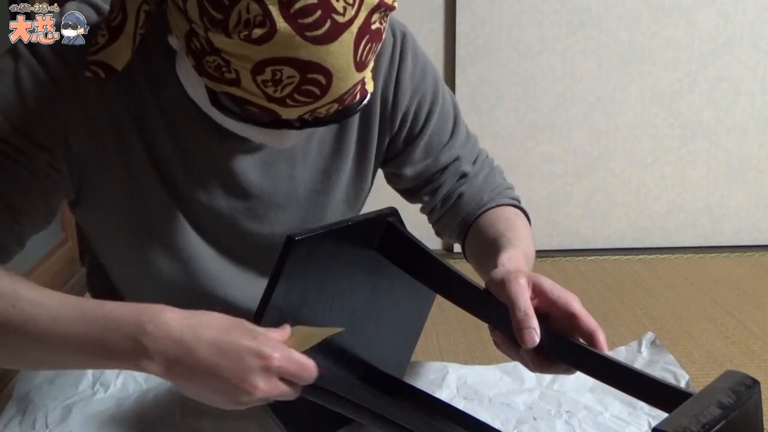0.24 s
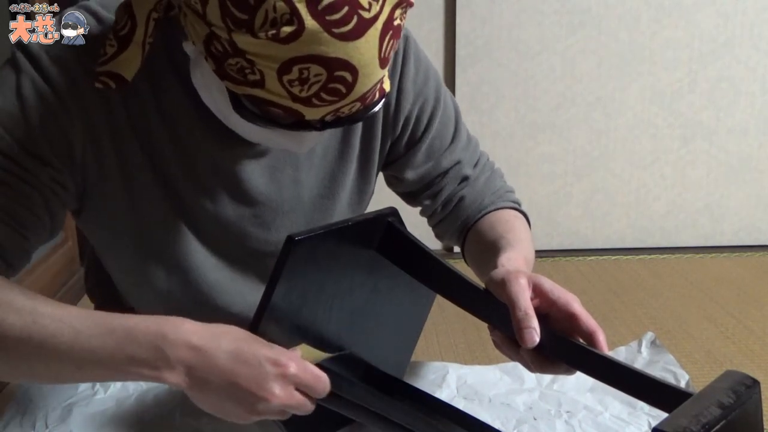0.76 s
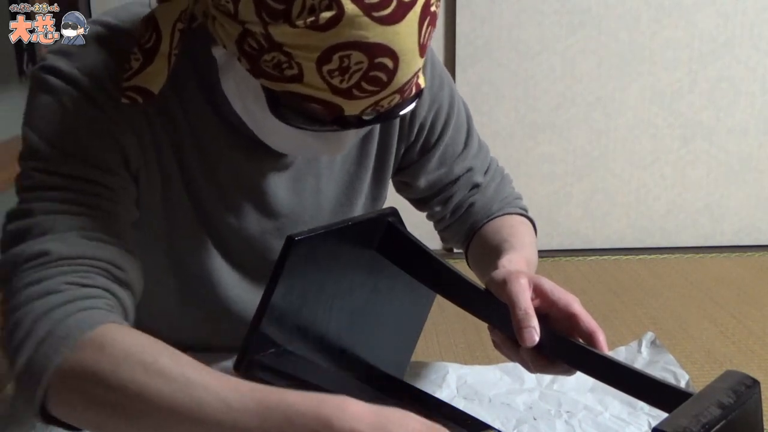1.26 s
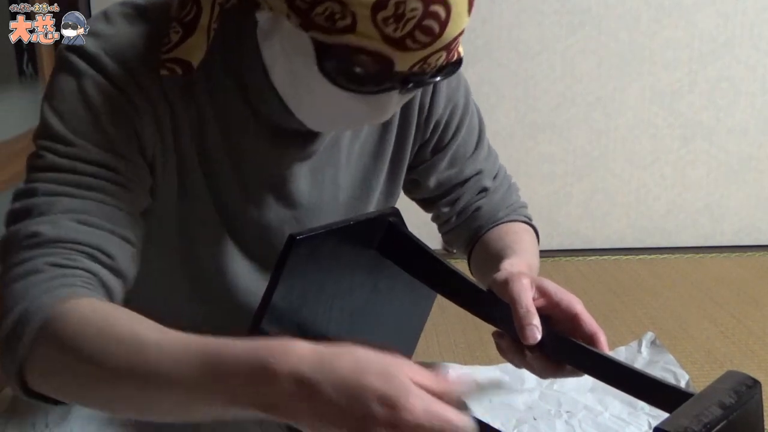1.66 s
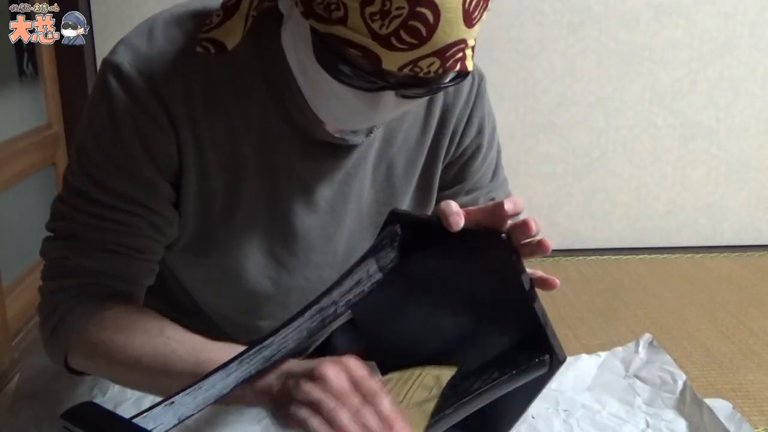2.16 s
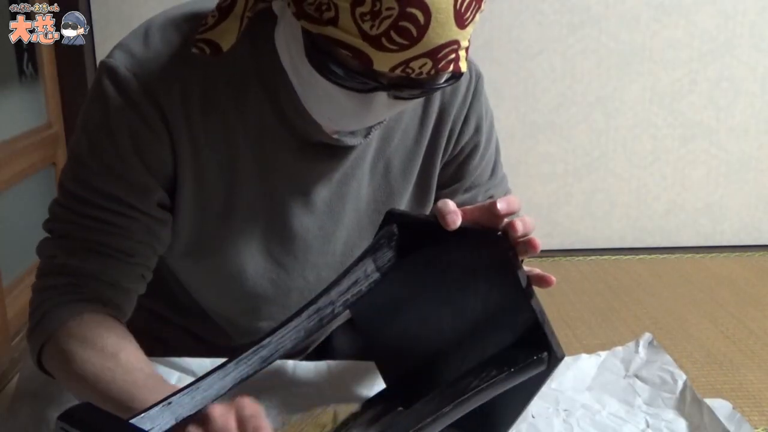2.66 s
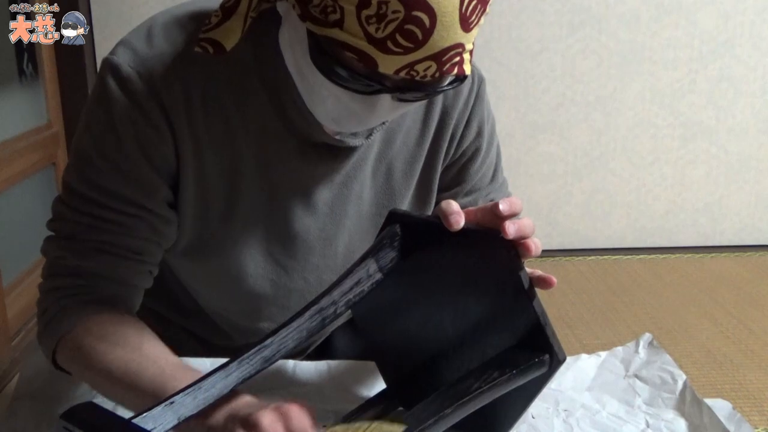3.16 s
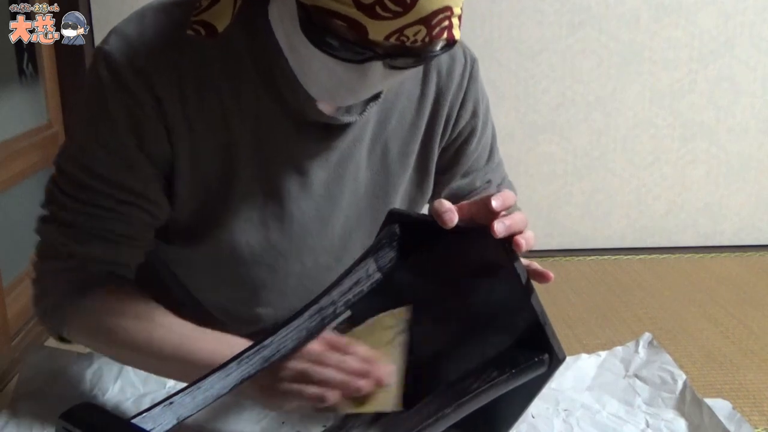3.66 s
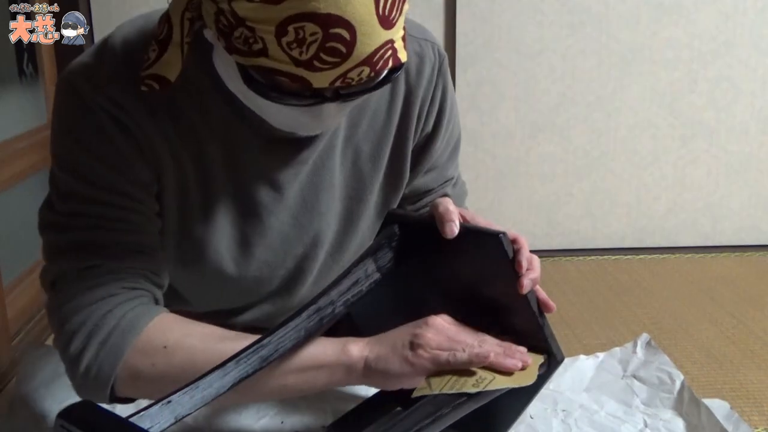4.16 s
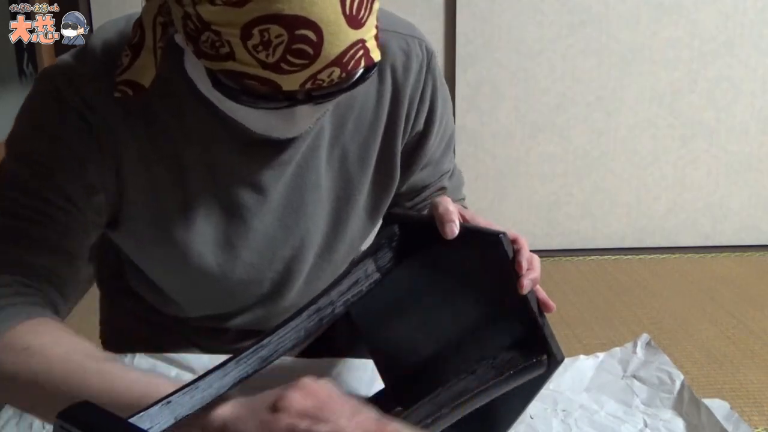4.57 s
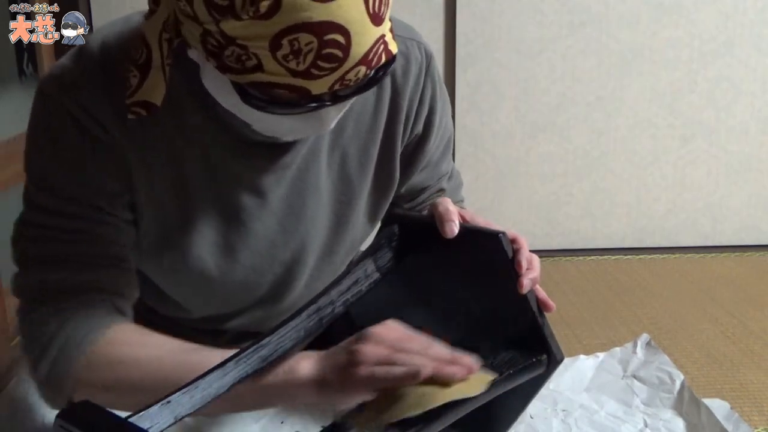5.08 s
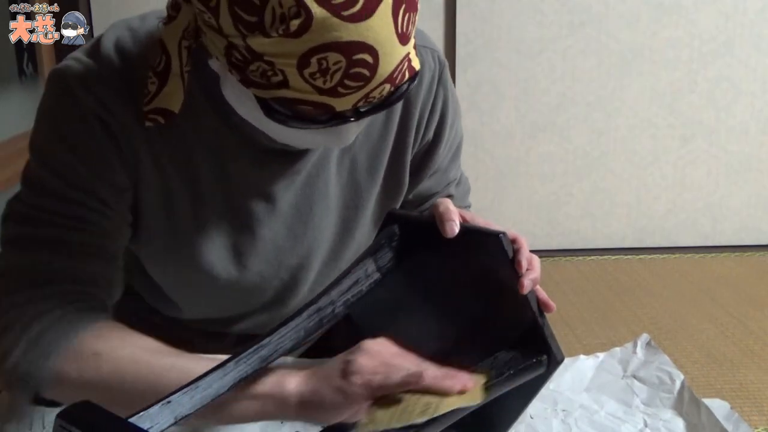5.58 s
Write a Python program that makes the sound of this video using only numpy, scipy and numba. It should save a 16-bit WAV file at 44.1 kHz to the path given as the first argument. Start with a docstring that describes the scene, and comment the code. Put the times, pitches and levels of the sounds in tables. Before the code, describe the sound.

Small taps come first, then a long bright sandpaper hiss ending in a sharp tick, followed by four more separate rubs with hollow wooden resonance. A cluster of paper snaps and light wood knocks follows the second stroke, and soft low thuds mark shifts of the shelf. High frog trills flutter continuously outside. Dry indoor sound, closely miked, centred, with gentle room hum.

```python
"""Sandpaper on a lacquered shelf

A close mono microphone hears the tail of a stroke, then five slow strokes of hand-drawn sandpaper.
Grit noise rings paper and board resonances; touches are noise ticks, cracks and ringing shelf modes.
Outside, stream frogs whistle near 2 kHz: sine notes close by, narrow bands of noise further off.
Beneath lie a low house hum and microphone hiss, both shaped noise."""
import sys
import numpy as np
from scipy import signal
from scipy.fft import rfft, irfft
from scipy.io import wavfile
from scipy.ndimage import uniform_filter1d
from numba import njit

SR = 44100
rng = np.random.default_rng(int(sys.argv[2]) if len(sys.argv) > 2 else 0)


def transcribe(signal):
    """Save signal, clipped to [-1, 1], as a 16-bit WAV file at the path in sys.argv[1]."""
    frames = np.atleast_2d(signal).T
    limited = np.clip(frames, -1, 1)
    pcm = np.round(limited * 32767).astype(np.int16)
    wavfile.write(sys.argv[1], SR, pcm)


N = 257103
T = np.arange(N) / SR  # time [s]


def undb(db):
    """Turn decibels into an amplitude factor."""
    return 10 ** (np.asarray(db) / 20)


def level(x, db):
    """Scale to an rms level [dB]."""
    return x * undb(db) / np.sqrt(np.mean(x ** 2))


@njit
def moving_bandpass(x, g, k):
    """State-variable band-pass with a moving centre, gain 1 there."""
    y, b, l = np.empty(len(x)), 0., 0.
    for i in range(len(x)):
        v = (b + g[i] * (x[i] - l)) / (1 + g[i] * (g[i] + k[i]))
        b, l, y[i] = 2 * v - b, l + 2 * g[i] * v, k[i] * v
    return y


def band(x, hz, width):
    """A resonance applied twice, for steep flanks."""
    hz = np.clip(hz, 30, .45 * SR)
    g = np.tan(np.pi * hz / SR) + np.zeros(len(x))
    k = width / hz + np.zeros(len(x))
    once = moving_bandpass(x + 1e-18, g, k)
    return moving_bandpass(once, g, k)


def curves(table):
    """Columns of a table, or of several in a row, as signals over time."""
    s, *columns = np.vstack(table).T
    return [np.interp(T, s, column) for column in columns]


def walk(rate):
    """Smooth random levels, a new one about every 1 / rate s; spread near 1."""
    k = int(1000 / rate)  # steps of 1 ms
    held = np.repeat(rng.standard_normal(int(1000 * T[-1]) // k + 2), k)
    smooth = uniform_filter1d(uniform_filter1d(held, k), k)
    return np.interp(1000 * T, np.arange(len(held)), 1.3 * smooth)


def add(out, s, x):
    """Mix a short sound in at time s."""
    i = int(s * SR)
    out[i:i + len(x)] += x[:N - i]


ROOM_DB, HISS_DB = -59, -64  # rms of the hum before its drift; rms of the hiss
# spectrum of the house hum at the microphone: (frequency [Hz], relative density [dB per Hz])
HUM_SPECTRUM = [(18, -47), (30, -9), (178, 3.5), (233, -1), (273, -1.5), (714, -10.5), (785, -7.5),
                (876, -31), (994, -14), (1300, -19), (1690, -55), (2860, -120)]


def room():
    """Noise shaped into a slowly drifting low house hum, plus the microphone's hiss."""
    f = np.fft.rfftfreq(N, 1 / SR)
    hz, db = np.transpose(HUM_SPECTRUM)
    shape = undb(np.interp(np.log(f + 1), np.log(hz), db))
    hum = irfft(rfft(rng.standard_normal(N)) * shape, N)
    hiss = rng.standard_normal(N) + level(band(rng.standard_normal(N), 7300, 11000), -1.1)
    return level(hum, ROOM_DB) * undb(2.1 * walk(3.07)) + level(hiss, HISS_DB)


# a deeper frog further off: (time [s], level before flutter [dB])
DEEP_FROG_LEVEL = [(0, -52), (.5, -51.5), (1, -78), (1.7, -46), (1.75, -71), (3.1, -60), (3.4, -60),
                   (3.7, -63.5), (4.2, -56.5), (4.8, -47), (5, -60), (5.4, -62), (5.83, -52)]


def deep_frog(flutter):
    """Distance blurs the deeper voice into a fluttering band of noise."""
    blur = band(band(rng.standard_normal(N) * flutter, 1800, 1160), 1800, 1160)
    return level(blur, 0) * undb(curves(DEEP_FROG_LEVEL)[0])


SWELL_S, FADE_S = 0.059, 0.013  # rise from a phrase's start; fall after its end
# phrases of the frog chorus outside, gliding in pitch: (start [s], end [s],
# first level [dB], middle level [dB], last level [dB], first pitch [Hz], last pitch [Hz])
CHORUS_PHRASES = [(-.1, 0.485, -43, -40.5, -39, 2100, 2194), (0.495, 0.55, -40, -38, -32, 2000, 1980),
                  (0.55, 1.058, -45.5, -46.5, -41.5, 2090, 1970),
                  (0.708, 1.715, -43, -40.5, -44, 2220, 2160), (1.723, 1.945, -39, -53, -55, 2310, 2390),
                  (1.993, 2.561, -52, -45, -46.5, 2060, 2165), (2.55, 3.065, -54, -44, -51.5, 2110, 2160),
                  (3.047, 3.292, -55, -51, -53, 2170, 2170), (3.316, 3.927, -57, -44.5, -44, 2180, 2336),
                  (3.91, 4.924, -53.5, -41, -45, 2060, 2255), (4.92, 5.04, -40, -57, -61, 2270, 2170),
                  (5.036, 5.777, -49, -42.5, -47, 2045, 2360)]


def chorus(flutter):
    """Many whistles blur into a fluttering narrow band of noise that glides in pitch."""
    out = np.zeros(N)
    for start, end, *db, first_hz, last_hz in CHORUS_PHRASES:
        on = (T > start) & (T < end + FADE_S)
        t, pipes = T[on], (rng.standard_normal(N) * flutter)[on]
        hz = np.interp(t, [start, end], [first_hz, last_hz])
        db = np.interp(t, [start, (start + end) / 2, end], db)
        gate = np.clip(np.minimum((t - start) / SWELL_S, (end - t) / FADE_S + 1), 0, 1)
        whistles = band(band(pipes, hz, 470), hz, 470)
        out[on] += level(whistles, 0) * undb(db) * gate
    return out


NOTE_S, LOW_NOTE_S = .0745, .034  # approximate note spacing of the two voices
LOW_VOICE_HZ, NOTE_SCATTER_DB = 2045, 1  # pitch below which the low voice sings; spread of note levels
# trills of the nearest frogs, evenly spaced notes: (first note [s], last note [s],
# first level before scatter [dB], last level before scatter [dB], first pitch [Hz], last pitch [Hz])
NEAR_TRILLS = [(.151, .449, -43, -47, 2170, 2100), (.783, .85, -42, -49, 2180, 2220),
               (.857, .992, -35, -39, 2015, 1980), (1.108, 1.332, -37, -32, 2160, 2120),
               (1.585, 1.67, -50, -36, 2010, 2107), (2.025, 2.0995, -43, -38, 2100, 2094),
               (2.243, 2.318, -51, -36, 2230, 2190), (2.607, 2.905, -36.5, -35.5, 2114, 2111),
               (2.98, 3.054, -52, -43, 2050, 2130), (3.452, 3.601, -37.5, -39, 2140, 2130),
               (3.98, 4.352, -38.5, -38, 2105, 2122), (5.115, 5.468, -38.5, -37, 2146, 2243)]


def near_frogs():
    """Each whistled note is a sine with a quick rise and decay, smeared by diffuse echoes."""
    near, t = np.zeros(N), T[:int(.08 * SR)]
    shape = np.e * t / .0065 * np.exp(-t / .0065)
    for first, last in np.reshape(NEAR_TRILLS, (-1, 3, 2)).transpose(0, 2, 1):
        # the lower voice trills faster
        gap_s = LOW_NOTE_S if first[2] < LOW_VOICE_HZ else NOTE_S
        count = 1 + round((last[0] - first[0]) / gap_s)
        for s, db, hz in np.linspace(first, last, count):
            db = db + NOTE_SCATTER_DB * rng.standard_normal()
            add(near, s, undb(db) * shape * np.sin(2 * np.pi * hz * t))
    t = T[:int(.3 * SR)]
    tail = rng.standard_normal(len(t)) * np.exp(-t / 0.14) * (t > .012)
    echoes = signal.fftconvolve(near, tail / np.sqrt(np.sum(tail ** 2)))[:N]
    return near + undb(-7.0) * echoes


def frogs():
    """Near notes over the noise blur of further frogs, which share one flutter."""
    flutter = undb(1.95 * walk(90))
    return near_frogs() + chorus(flutter) + deep_frog(flutter)


# the shelf rocks on the mat: (time [s], level before the envelope [dB], upper mode [Hz])
SHELF_THUDS = [(1.849, -41.5, 117), (2.877, -42.5, 96), (4.086, -46.5, 90), (4.893, -31, 106),
               (4.965, -34.5, 110.7), (5.019, -55, 206)]


def thuds():
    """The mat takes the weight softly: two low modes with a gentle rise and decay."""
    out, t = np.zeros(N), T[:int(.3 * SR)]
    for s, db, hz in SHELF_THUDS:
        modes = np.sin(2 * np.pi * hz * t) + 0.32 * np.sin(2 * np.pi * 0.87 * hz * t)
        envelope = (1 - np.exp(-t / 0.006)) ** 2 * np.exp(-t / 0.043)
        add(out, s, undb(db) * modes * envelope)
    return out


SNAP_S, RISE_S, RUSTLE_DB = 0.00044, 0.00085, 1  # decay of the snap; rise and level of the rustle
REACH_DB = 36  # loss of a mode one octave from the knock
# modes of the shelf: (frequency [Hz], nominal width [Hz], relative level [dB])
SHELF_MODES = [(201.4, 5.6, -6), (310, 56, -3.5), (386, 47, -4.5), (505, 13, -7), (545, 14, -9.5),
               (588, 30, -4.5), (675, 35, -5), (786, 27, -9.5), (984, 64, -5.5), (1080, 64, -2.5),
               (1480, 290, -13), (1820, 410, -9.5), (2590, 1000, -6.5), (3740, 400, -10)]
# paper ticks and wood knocks close to the microphone: (time [s], tick peak [dB], knock peak [dB],
# crack peak [dB], tick centre [Hz], knock centre [Hz], crack centre [Hz], rustle decay [s],
# damping by the hand [factor on the mode widths])
TOUCHES = [(0.299, -39, -69, -41, 3660, 336, 3000, .002, 1.1),
           (0.372, -45, -59, -40, 3000, 1140, 1790, 0.0036, 1.1),
           (0.3867, -25.5, -34, -26, 4600, 525, 1730, 0.0026, 0.72),
           (0.501, -48, -42, -32.5, 3000, 1125, 1500, 0.0068, 1.1),
           (0.5288, -42, -45, -36, 3800, 1120, 1900, .005, 1.1),
           (0.5416, -39, -45, -30, 6700, 565, 1520, 0.0058, 0.97),
           (0.569, -58, -40, -54, 6200, 710, 2000, .003, 0.72),
           (0.59, -36, -66, -55, 6530, 775, 2000, 0.0085, 0.31),
           (0.6185, -28.5, -28.5, -29.5, 6200, 1900, 2810, 0.002, 0.17),
           (.628, -38, -60, -38, 6000, 900, 2900, 0.0027, 0.27),
           (1.474, -16, -46, -17.5, 6400, 1030, 2280, 0.0031, 1.9),
           (1.487, -30, -44, -34, 6250, 1040, 2300, .005, 1.9),
           (1.717, -38, -73, -55, 4810, 301, 2000, 0.0027, 1.1),
           (1.7968, -27.5, -47, -49, 6100, 495, 1970, 0.0025, 1.1),
           (1.846, -55, -36, -55, 6000, 326, 2000, .003, 1.7),
           (2.388, -19, -50, -47, 6440, 926, 3800, 0.003, 1.1),
           (2.423, -27.5, -60, -50, 7100, 900, 2000, .003, 1.1),
           (2.447, -27, -55, -49, 6040, 900, 3300, .003, 1.1),
           (2.4585, -44, -25, -23.5, 6670, 594, 1420, .001, 2),
           (2.4672, -42, -50, -31, 4000, 605, 2000, .003, 1.9),
           (2.4746, -29, -43, -22, 4200, 1030, 1860, 0.0019, 2.2),
           (2.4843, -25, -51, -27, 5540, 412, 2180, .003, 1.9),
           (2.5114, -25.5, -30, -26, 3930, 450, 1820, 0.0068, 3.9),
           (2.5264, -27, -25, -27, 5600, 790, 1100, 0.0015, 1.2),
           (2.5372, -51, -35, -46, 3900, 380, 1100, 0.0033, 2),
           (2.549, -48, -34, -39, 3900, 480, 1100, .003, 4.4),
           (2.564, -55, -37, -58, 3900, 330, 2000, .003, 0.75),
           (2.7957, -28.5, -38.5, -39, 6350, 760, 3200, 0.0023, 3.5),
           (2.8469, -53, -40, -47, 5670, 511, 1200, .003, 2.5),
           (2.87, -36, -41.5, -50, 6300, 482, 3000, 0.0037, 2.3),
           (3.0114, -40, -48, -58, 6280, 490, 2000, .003, 0.53),
           (3.609, -37, -38.5, -40, 6020, 548, 2000, 0.0028, 2.2),
           (3.637, -23, -53, -43, 7960, 548, 3750, .004, 1.5),
           (4.022, -27, -36.5, -31.5, 5200, 770, 1980, 0.0028, 0.76),
           (4.0536, -45, -47, -42, 6080, 603, 2000, .003, 1.3),
           (4.092, -47, -36, -32, 7820, 360, 1970, 0.0023, 1.1),
           (5.311, -28.5, -44, -43, 6860, 522, 4000, 0.0035, 1.1),
           (5.3286, -40, -35, -30, 5330, 730, 1340, 0.0062, 1.8),
           (5.341, -30, -47, -46, 6500, 1140, 2000, .003, 1.4),
           (5.366, -34, -65, -60, 12000, 700, 2000, .002, 1.1)]


def taps():
    """Each touch is a bright tick, a crack and a short ring of the shelf modes nearest the knock."""
    out, t = np.zeros(N), T[:int(.2 * SR)]
    for s, tick_db, knock_db, crack_db, tick_hz, knock_hz, crack_hz, rustle_s, damping in TOUCHES:
        noise, detune = rng.standard_normal((2, len(t))), rng.standard_normal(len(SHELF_MODES))
        # a sharp snap, then a rustle that rises and dies away
        snap = np.exp(-t / SNAP_S)
        rustle = undb(RUSTLE_DB) * np.exp(-t / rustle_s) * (1 - np.exp(-t / RISE_S))
        loose = np.clip(2 * damping, .1, 1) ** 2  # a loosely held sheet rings at a pitch
        tick = band(noise[0] * (snap + rustle), tick_hz, 1.3 * tick_hz * loose)
        crack = band(snap + noise[1] * rustle, crack_hz, 0.88 * crack_hz * loose)
        knock = np.zeros(len(t))
        for (hz, width, db), d in zip(SHELF_MODES, detune):
            gain = undb(db - REACH_DB * np.log2(hz / knock_hz) ** 2)
            ring = np.sin(2 * np.pi * hz * (1 + 0.0029 * d) * t)
            knock += gain * ring * np.exp(-np.pi * damping * width * t)
        knock = band(knock, knock_hz, 2 * knock_hz)
        for x, db in ((tick, tick_db), (crack, crack_db), (knock, knock_db)):
            add(out, s, x * undb(db) / np.abs(x).max())
    return out


BRUSH_RISE = 0.24  # share of the length
# paper and fingers brush the shelf: (time [s], length [s],
# peak drive of paper [dB], scuff [dB], boards [dB], boom [dB])
LIGHT_TOUCHES = [(0.39, 0.18, -61, -68, -55.5, -62), (0.481, 0.21, -77, -75, -57.5, -51),
                 (0.61, 0.05, -48, -59, -67, -66), (1.454, 0.17, -39, -41.5, -55.5, -59),
                 (1.83, 0.12, -53, -69, -57, -43), (2.467, 0.1, -43, -46, -47, -52),
                 (2.785, 0.11, -54, -60, -59, -73), (2.839, 0.13, -49.5, -56, -60.5, -58),
                 (3.597, 0.054, -40.5, -57, -66, -52), (3.621, 0.034, -40, -55, -60, -42),
                 (4.003, 0.19, -66, -63, -51.5, -45), (4.87, 0.079, -41.5, -64, -56, -46),
                 (4.894, 0.7, -73, -71, -74, -44.5), (5.309, 0.087, -65, -79, -51.5, -53)]


def brushes():
    """Paper, scuff, board and boom drive of the light touches: a quick rise, a slower fall."""
    out = np.zeros((4, N))
    for s, length, *db in LIGHT_TOUCHES:
        swell = np.interp(T, [s, s + BRUSH_RISE * length, s + length], [0, 1, 0]) ** 2
        out += undb(db)[:, None] * swell
    return out


def grit(scatter_db, patchy_db):
    """Sizes of the slipping grains: a few are large, and they come in patches."""
    patches = walk(120) + 1.8 * walk(25)
    return undb(scatter_db * rng.exponential(size=N) + patchy_db * patches)


def slips(size, hz, width, db):
    """Slips heard through one resonance: shared grain sizes on fresh noise."""
    return level(band(size * rng.standard_normal(N), hz, width), db)


# reflections off boards and mat: (mean delay [ms], level [dB])
REFLECTIONS = [(1.302, -10), (2.3, -9), (3.9, -11)]


def bounced(x):
    """Near surfaces return the sound; the paths drift as the hand moves."""
    out = x
    for ms, db in REFLECTIONS:
        delay_s = ms / 1000 * (1 + .06 * walk(4))
        out = out + undb(db) * np.interp(T - delay_s, T, x)
    return out


FULL_DB, GRIP_DB = -26.5, -36.5  # hiss of a full stroke; hiss above which the boards ring no louder
DULL, DRIVE = 0.45, 0.74  # dB lost in brightness and in the boards per dB of lost hiss
# the hand presses and moves, first the tail and then five strokes, one table each:
# (time [s], paper hiss drive [dB], scuff drive [dB], coarse rasp against the hiss [dB])
STROKE_MOVES = [
    [(0, -54.5, -60, -2), (.1, -66.5, -63, 0), (.33, -66, -65, 2)],
    [(.44, -59.5, -59.5, -4), (.66, -49.5, -57, -11), (.76, -35, -49, -11), (.83, -27, -43.5, -7.5),
     (.96, -29, -47.5, -4), (1.01, -24.5, -41, -3.5), (1.06, -23.5, -39.5, -10), (1.105, -25, -37.5, -12),
     (1.15, -20, -36.5, -8), (1.24, -24.5, -37.5, -4), (1.33, -25, -37.5, -12), (1.388, -26, -37.5, -16),
     (1.42, -25, -41, -12), (1.455, -22, -42.5, -8), (1.53, -25, -45.5, -17), (1.56, -32.5, -46.5, -8),
     (1.692, -57.5, -61, 6)],
    [(1.75, -52, -63, -10), (1.842, -39, -50.5, -16), (1.938, -33.5, -49.5, -19), (2.08, -29.5, -44.5, -5),
     (2.2, -26.5, -45, -20), (2.35, -36.5, -49, -15), (2.52, -53, -48, -5), (2.68, -66, -65.5, 1)],
    [(2.95, -72, -80, -4), (3.074, -36, -48.5, -9), (3.136, -30, -51, -9), (3.25, -28, -45.5, -9),
     (3.42, -28.5, -43, -16), (3.46, -25.5, -41, -6), (3.52, -29, -46, -9), (3.555, -42, -47, -6),
     (3.586, -45, -52, -7), (3.67, -54, -58.5, -9), (3.94, -68.5, -67.5, 6)],
    [(4.005, -62, -59, -10), (4.03, -48, -51.5, 5), (4.2, -38, -48, -3.5), (4.456, -24.5, -41, -5.5),
     (4.56, -23.5, -42, -12), (4.7, -28, -41, -6), (4.82, -37, -52.5, 2), (4.9, -49, -55, -1),
     (5.04, -65, -72, 1)],
    [(5.29, -72, -69, -4), (5.315, -49, -69.5, -8), (5.372, -43.5, -54, -7), (5.408, -32.5, -41, -4),
     (5.52, -26, -42.5, -3), (5.59, -23.5, -39.5, -8), (5.645, -20.5, -47, -16), (5.74, -25.5, -45.5, -11),
     (5.785, -35.5, -46, -2), (5.8, -41, -64, -2), (5.83, -40, -62, -6)],
]
# where each stroke lies on the shelf: (time [s], brightness at a full stroke [dB],
# cupped paper resonance [Hz], its width [Hz], shift of the paper's rings [semitones],
# paper rings above 10 kHz [dB], drag in the boards [dB], hollow ring [dB], deep ring [dB],
# boom [dB], paper's lowest ring above the rasp [dB])
SHELF_PLACES = [(.8, -6.5, 6200, 2180, -0.15, -5, -54.5, -53, -56, -58, -4),
                (1.0, -5.5, 6300, 2220, -0.22, -3, -57, -53, -64, -53, -5),
                (1.17, -14, 6940, 1500, 0.16, 4.5, -56, -59, -55, -53.5, 1),
                (1.33, -16.5, 6800, 1810, -0.087, 6.5, -54, -52, -50.5, -48, 4.5),
                (1.5, -14.5, 6500, 1510, -0.14, -0.5, -64, -61, -53.5, -51, -1.5),
                (1.9, -2.5, 6480, 2200, -0.08, -3, -60, -50, -57.5, -72, -4.5),
                (2.3, -4.5, 6560, 2200, 0.021, -1.5, -57, -50, -54.5, -71, 1.5),
                (3.1, -5, 6450, 2200, 0.6, -1.5, -61, -50.5, -67, -54.5, 1.5),
                (3.3, -0.5, 6700, 2220, 0.35, -2.5, -59, -50.5, -52.5, -46, 0.5),
                (3.5, -1, 6540, 2210, -0.39, -2.5, -61.5, -55, -51, -55, 0),
                (4.2, -3, 6400, 1810, -0.14, -0.5, -56, -48, -65, -60, 0),
                (4.45, -4, 6400, 1810, -0.42, -4, -58, -48, -63, -60, 2),
                (4.7, -3.5, 6400, 1810, -0.26, 1, -63.5, -48, -53, -51, 2.5),
                (5.4, -6.5, 6430, 1500, -.6, 1.5, -54, -52, -58, -59, 6.5),
                (5.53, -5.5, 6660, 1100, -.4, -1, -55.5, -45, -53, -54, -3),
                (5.64, -7, 6530, 905, -0.093, -2, -55, -46, -54, -48, -4.5),
                (5.76, -6.5, 6740, 1500, 0.59, 0, -62, -52.5, -59, -50, -2)]
# bands in which the rubbed paper rings: (centre before shift [Hz], width [Hz], relative level [dB])
PAPER_RINGS = [(5390, 3400, -5), (5806, 620, -7.5), (7690, 1500, -4.5), (8530, 1100, -8),
               (9400, 1830, -3.5), (10470, 1100, -5.5), (11480, 2050, -2), (12940, 3500, -2),
               (14850, 5300, -9)]


def sanding():
    """Slips ring the paper in the treble and drag through the boards below."""
    stroke_db, scuff_db, rasp_db = curves(STROKE_MOVES)
    (bright_db, cup_hz, cup_width, shift, upper_db,
     drag_db, hollow_db, deep_db, boom_db, edge_db) = curves(SHELF_PLACES)
    brush_paper, brush_scuff, brush_boards, brush_boom = brushes()
    hiss = undb(stroke_db) + brush_paper
    scuff = undb(scuff_db) + brush_scuff
    lost_db = FULL_DB - 20 * np.log10(hiss)
    bright_db = bright_db - DULL * lost_db
    slack = undb(-DRIVE * np.maximum(GRIP_DB - stroke_db, 0))

    size = grit(2.0, 0.63)
    paper = slips(size, cup_hz, cup_width, -4.0) * hiss
    for hz, width, db in PAPER_RINGS:
        if hz < 5400:  # the coarse rasp
            tilt_db = rasp_db
        else:  # pressing harder tilts the paper's rings upward
            tilt_db = bright_db * np.clip(hz / 7000 - .6, 0, 1)
            tilt_db = tilt_db + upper_db * (hz > 10000) + edge_db * (hz < 6500)
        ring_hz = hz * 2 ** (shift / 12 + 0.017 * walk(5.09))
        paper = paper + slips(size, ring_hz, width, db) * hiss * undb(tilt_db + 1.1 * walk(9))
    out = undb(-1.1) * bounced(paper)

    size = grit(2.04, 1.5)
    out = out + slips(size, 2670, 5300, -2.5) * scuff

    size = grit(1.5, .8)
    # where the hand is on the board decides which modes answer
    boom = undb(boom_db) * slack + brush_boom
    deep = undb(deep_db) * slack + undb(5) * brush_boards
    drag = undb(drag_db) * slack + brush_boards
    hollow = undb(hollow_db) * slack + brush_boards
    drives = (boom, deep, drag, hollow, scuff)
    for hz, width, db in SHELF_MODES:
        region = np.searchsorted([250, 450, 900, 1200], hz)  # upper edges of the first four drives [Hz]
        ring = slips(size, hz, 1.56 * width + 40, db)
        out = out + ring * drives[region] * undb(2.4 * walk(12))
    return out


def scene():
    """The close sounds with a short wall echo, frogs and room; one microphone feeds both channels."""
    close = sanding() + taps() + thuds()
    t = T[:int(.2 * SR)]
    walls = band(rng.standard_normal(len(t)), 1210, 5500) * np.exp(-t / 0.017) * (t > .004)
    wet = signal.fftconvolve(close, walls / np.sqrt(np.sum(walls ** 2)))[:N]
    return np.tile(close + undb(-15.5) * wet + frogs() + room(), (2, 1))


TOP_HZ = 15800  # top of the recorder's pass band


def record(dry):
    """The recorder cuts the top steeply."""
    lowpass = signal.ellip(12, .3, 90, TOP_HZ, fs=SR, output="sos")
    return signal.sosfilt(lowpass, dry)


dry = scene()
out = record(dry)
transcribe(out)
```